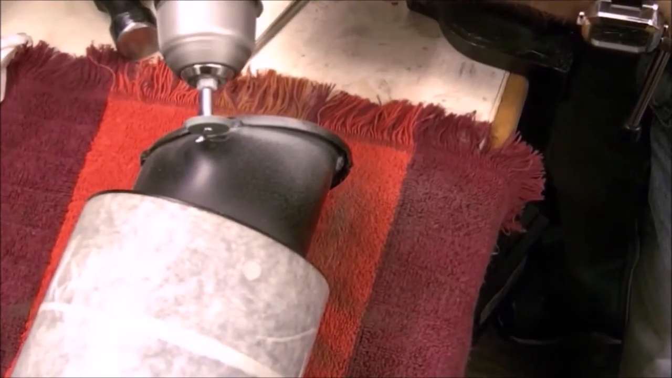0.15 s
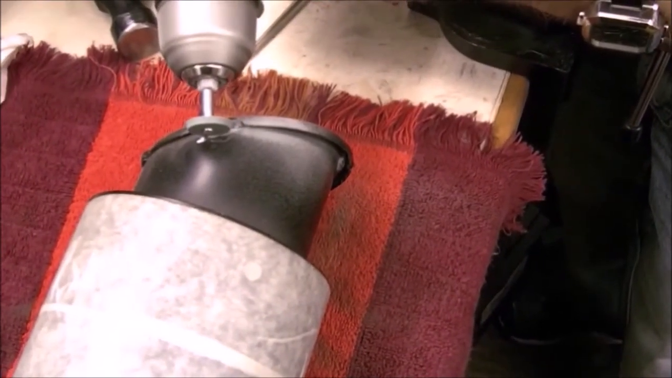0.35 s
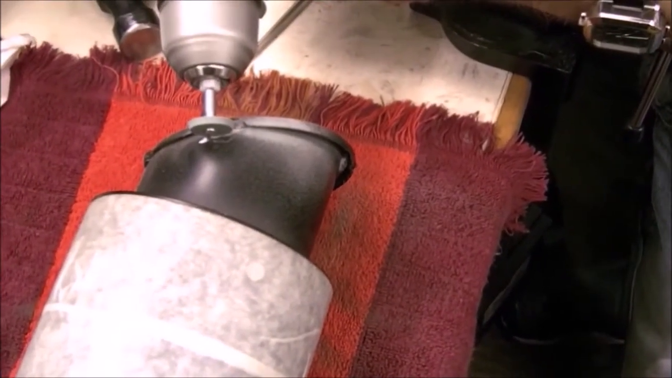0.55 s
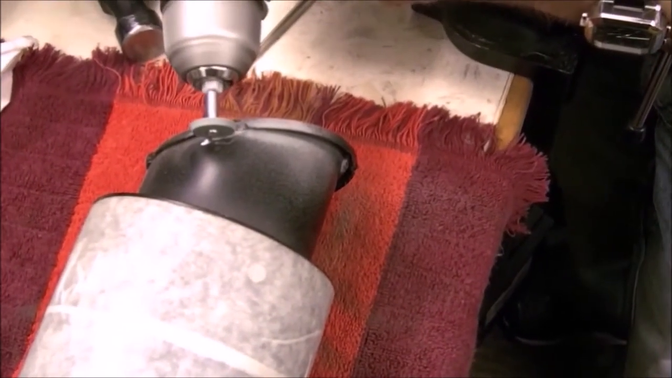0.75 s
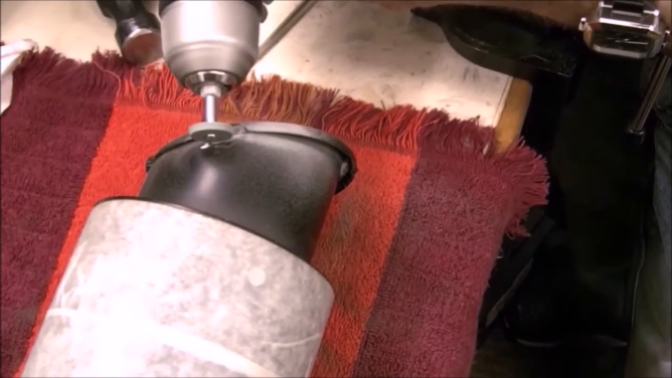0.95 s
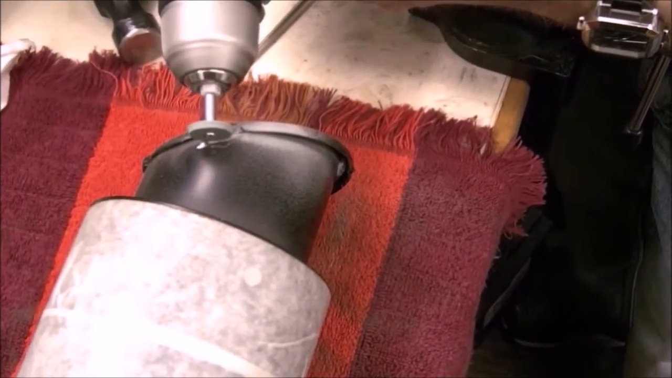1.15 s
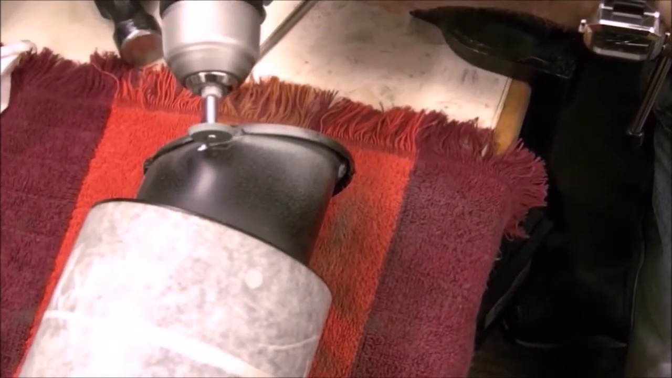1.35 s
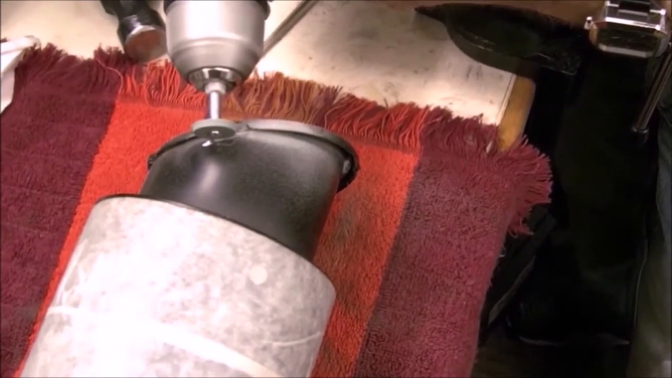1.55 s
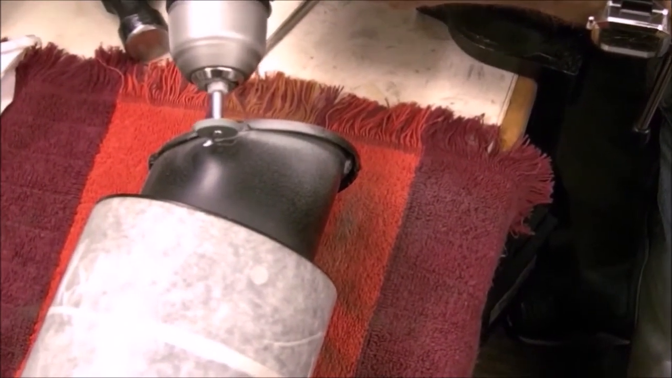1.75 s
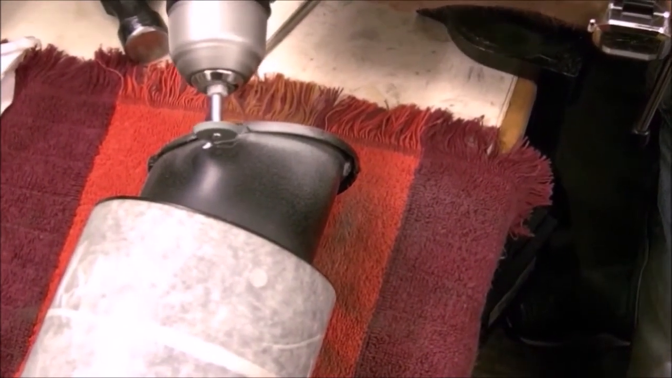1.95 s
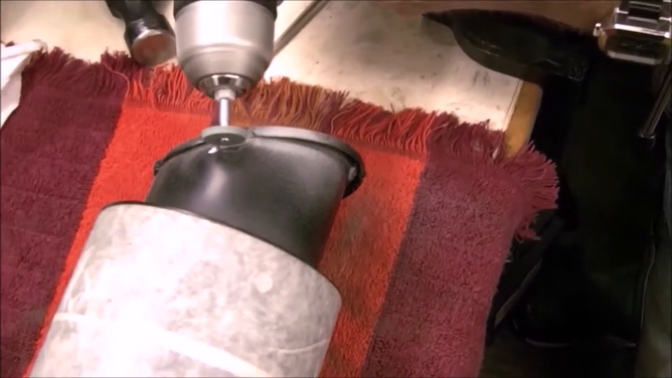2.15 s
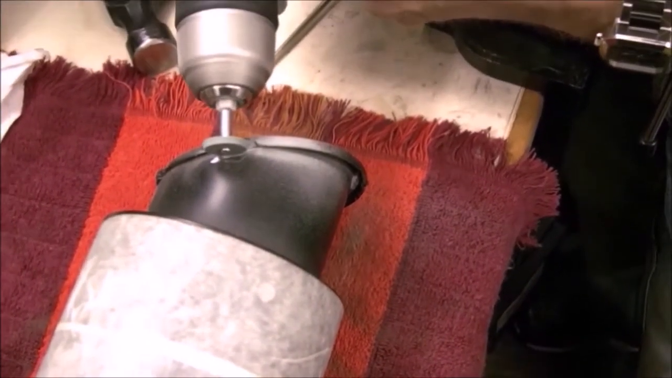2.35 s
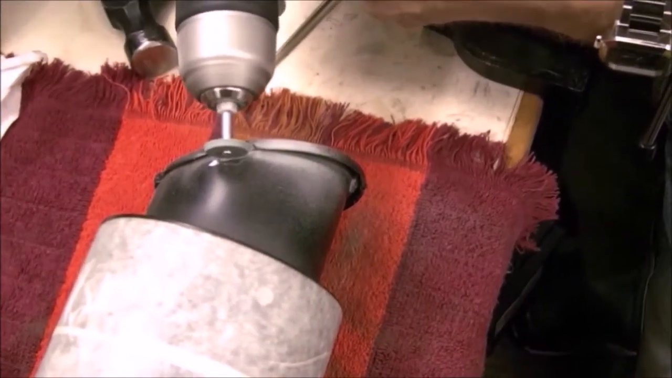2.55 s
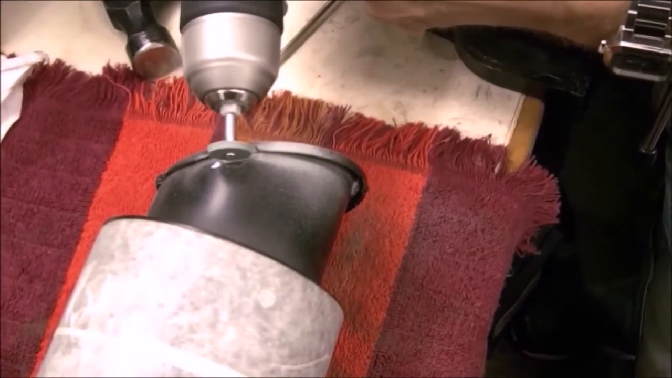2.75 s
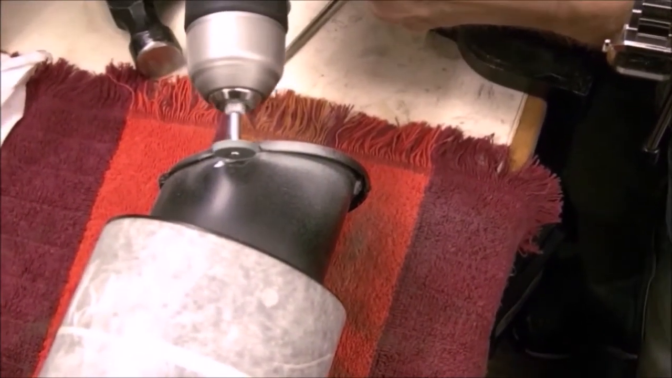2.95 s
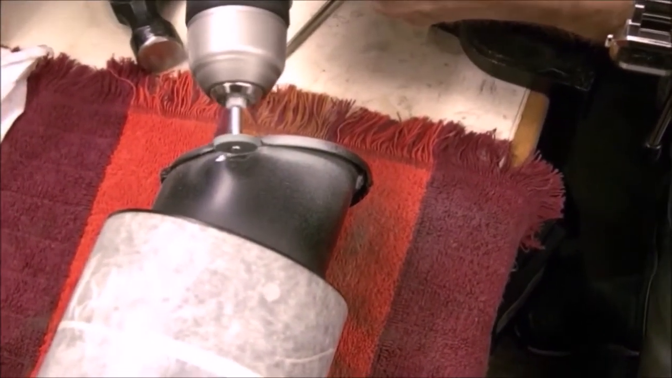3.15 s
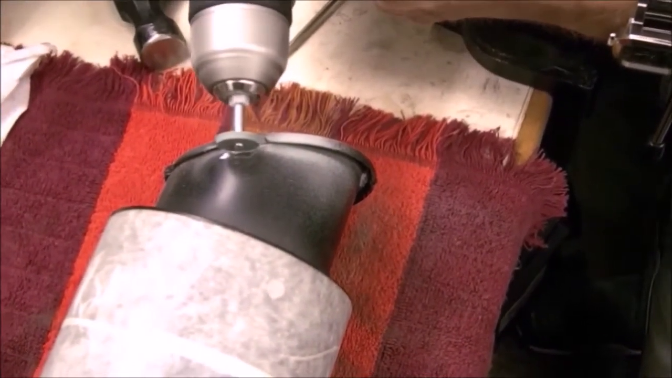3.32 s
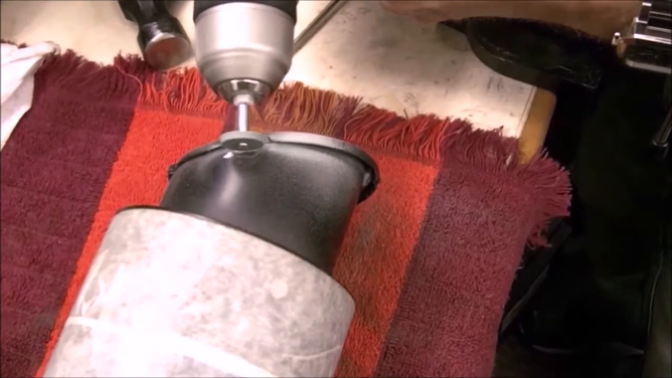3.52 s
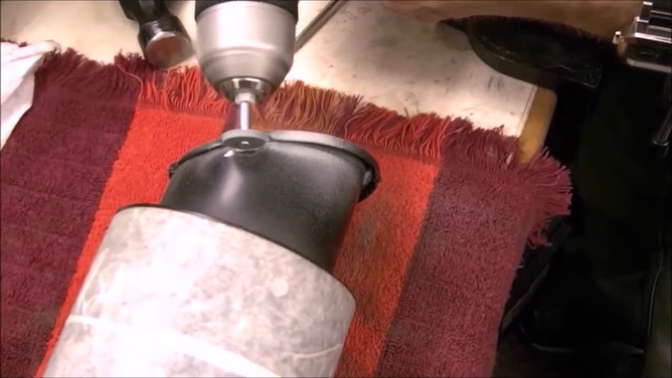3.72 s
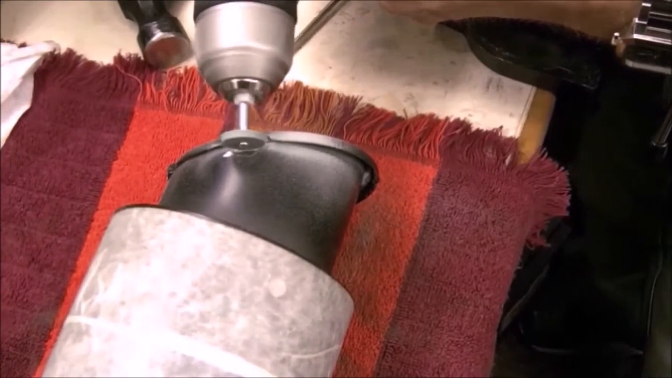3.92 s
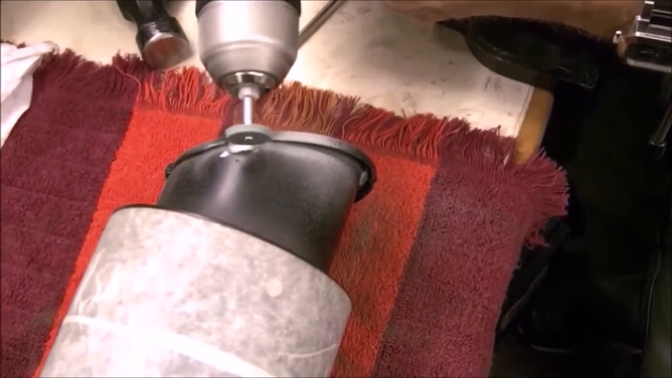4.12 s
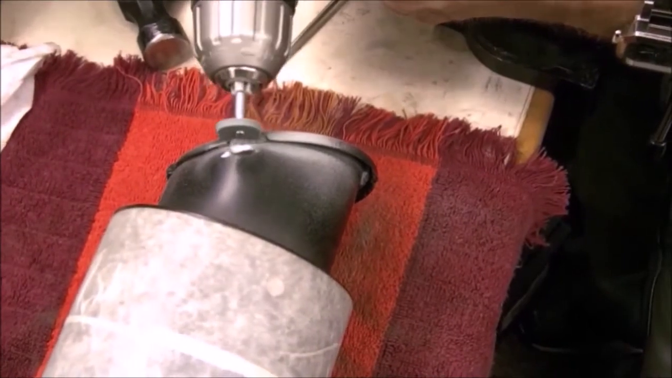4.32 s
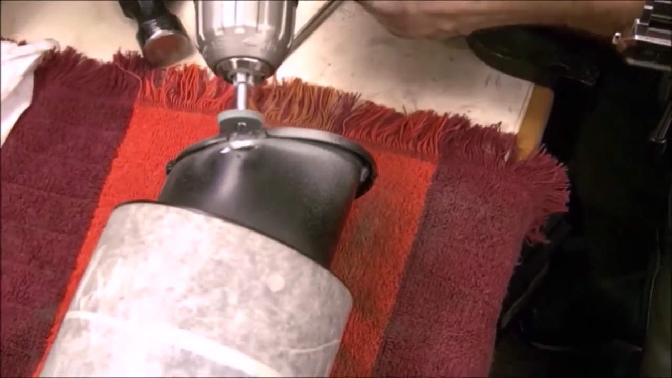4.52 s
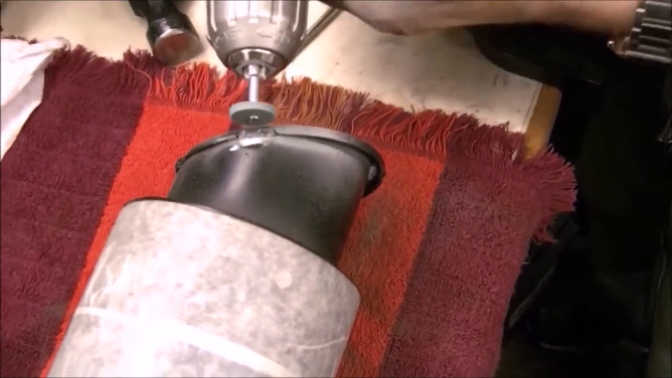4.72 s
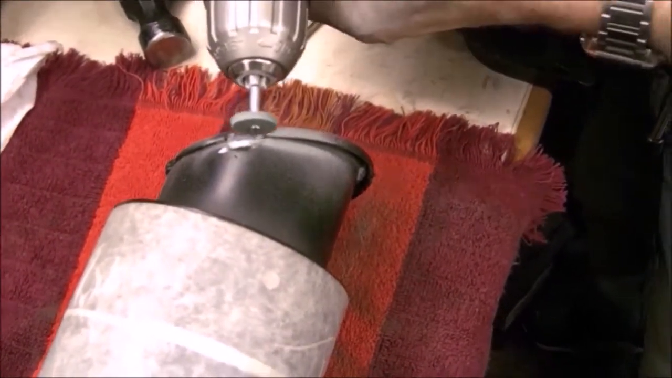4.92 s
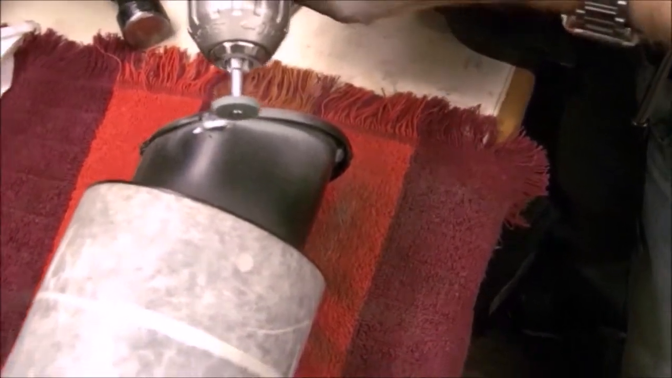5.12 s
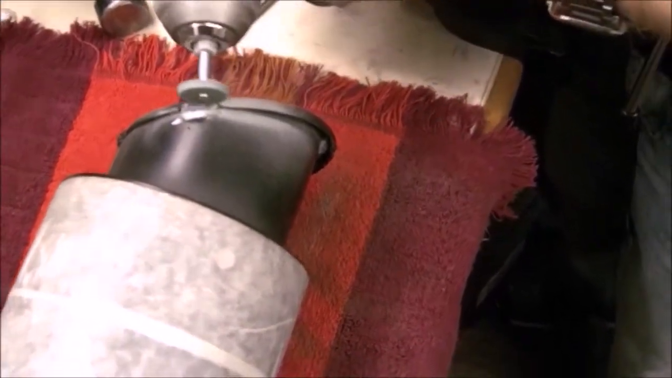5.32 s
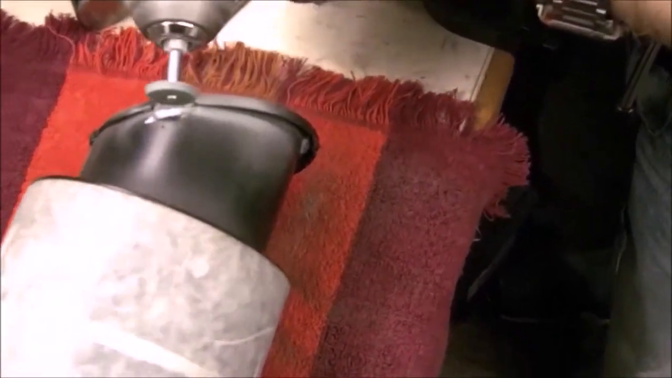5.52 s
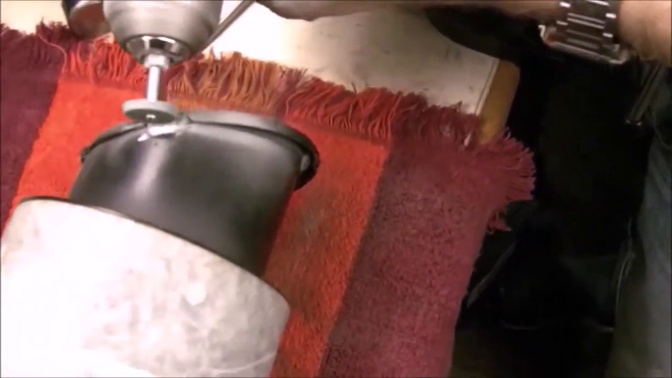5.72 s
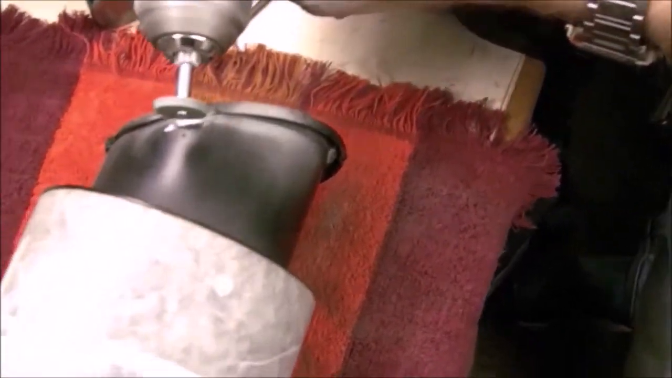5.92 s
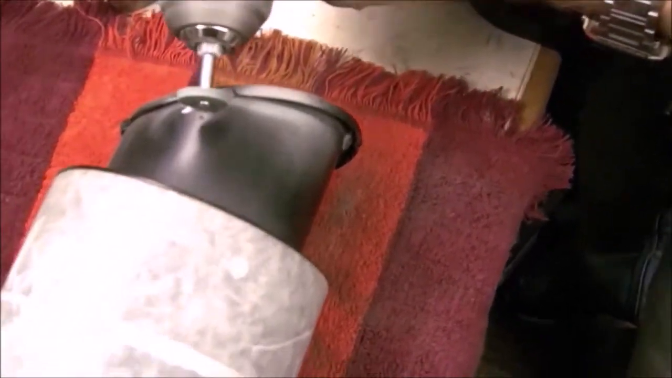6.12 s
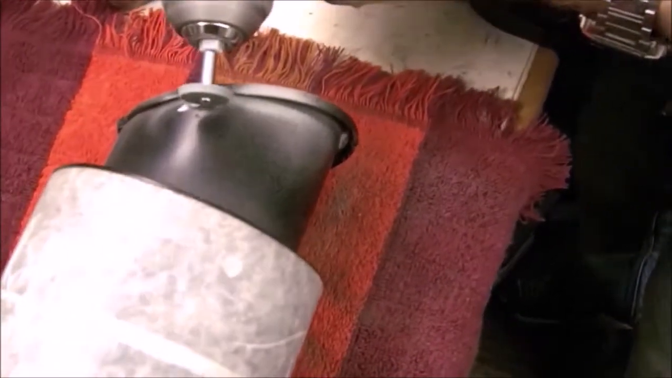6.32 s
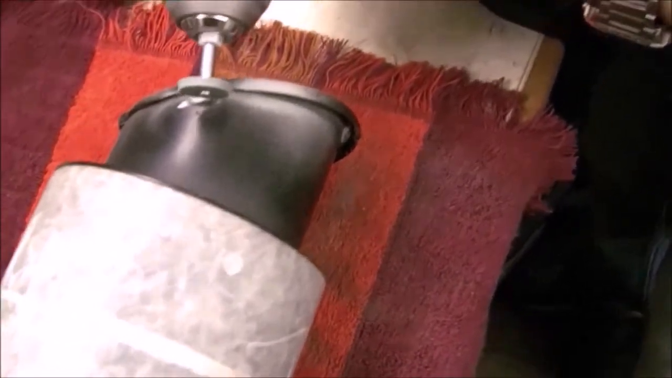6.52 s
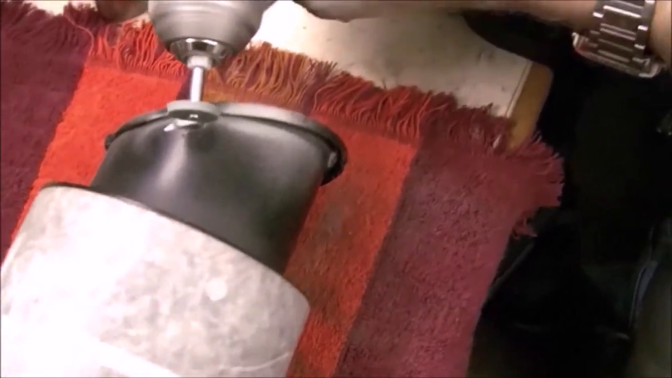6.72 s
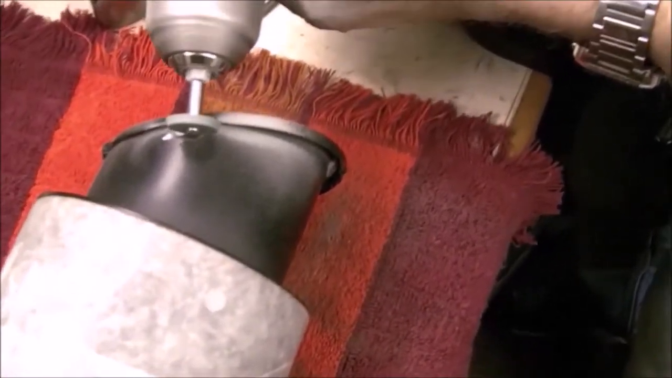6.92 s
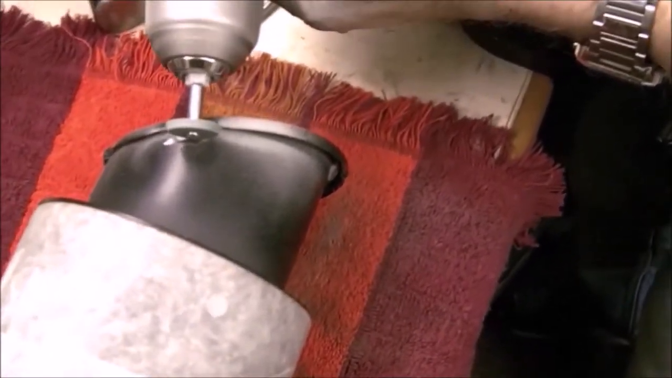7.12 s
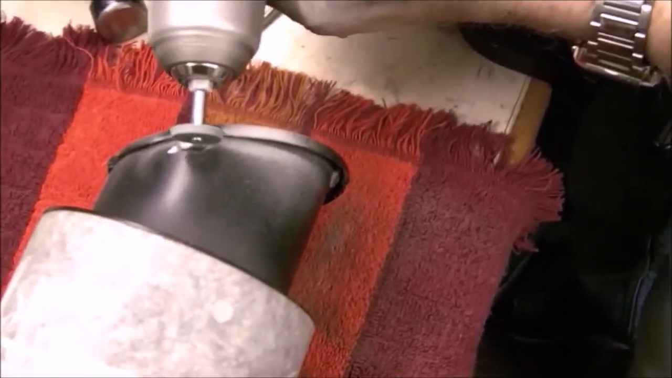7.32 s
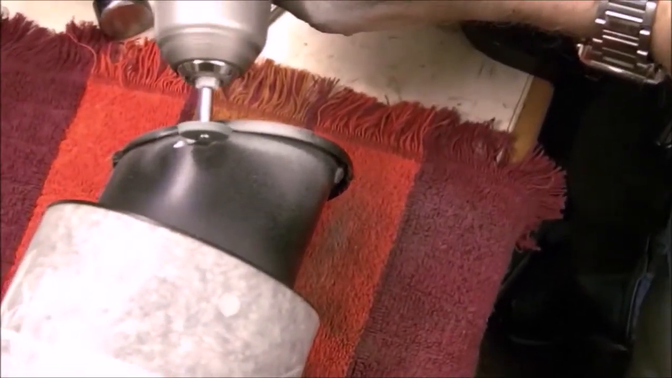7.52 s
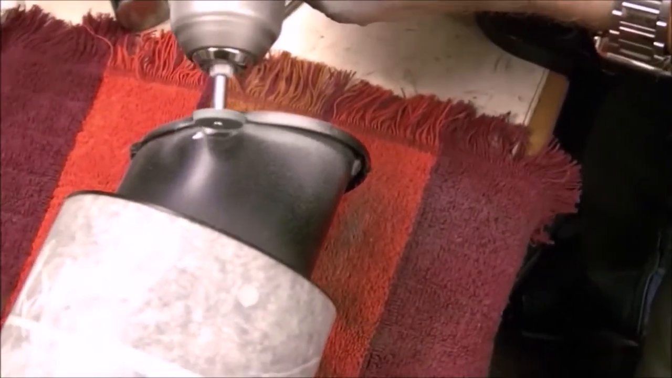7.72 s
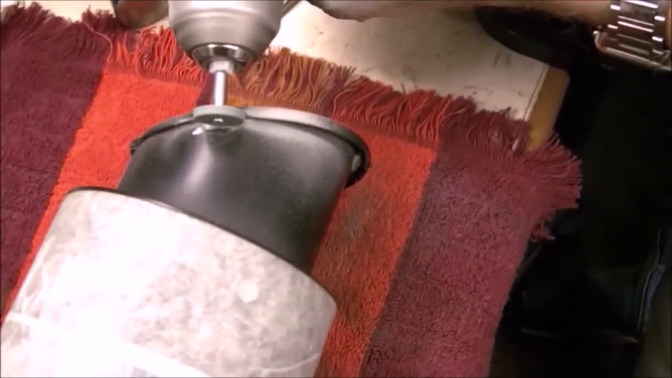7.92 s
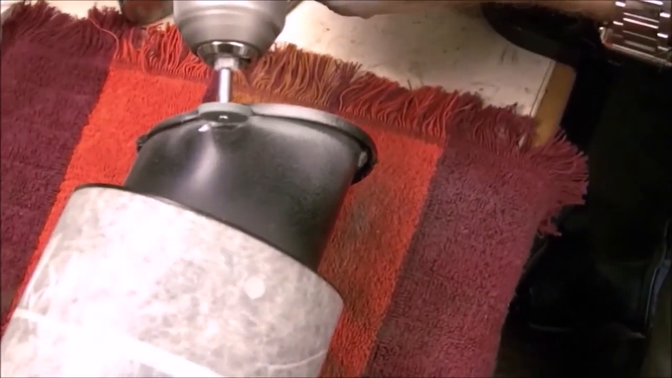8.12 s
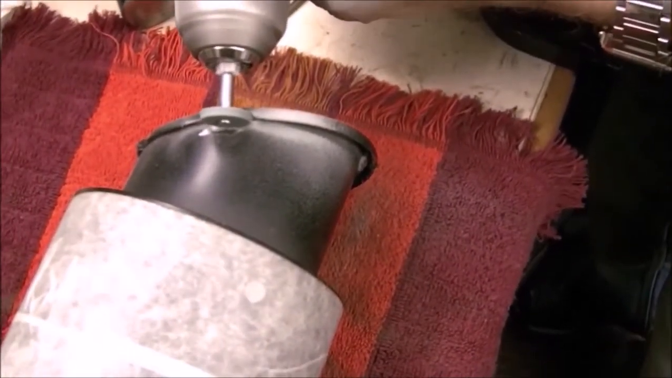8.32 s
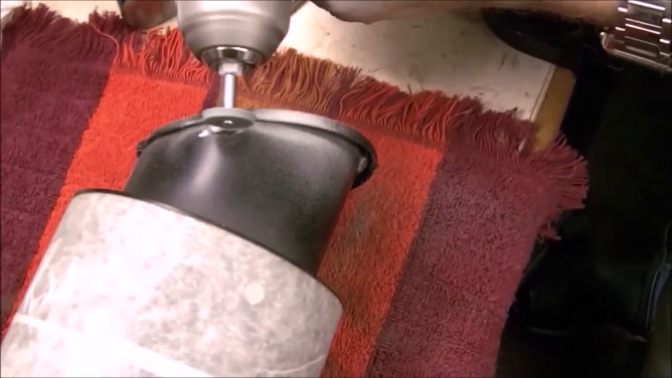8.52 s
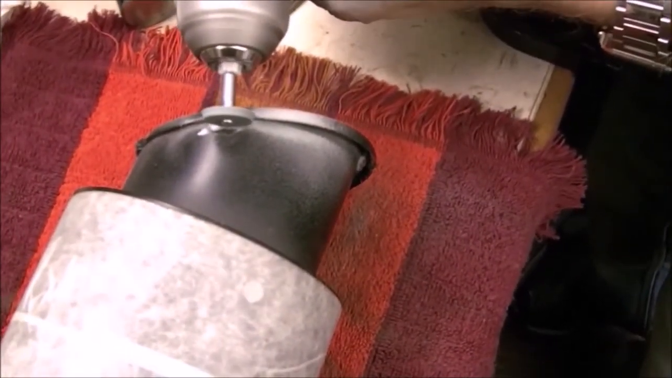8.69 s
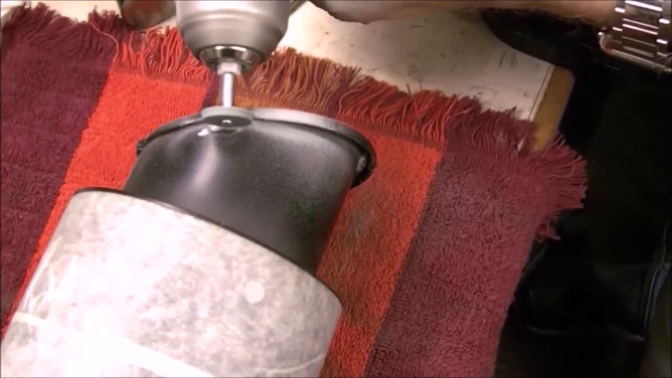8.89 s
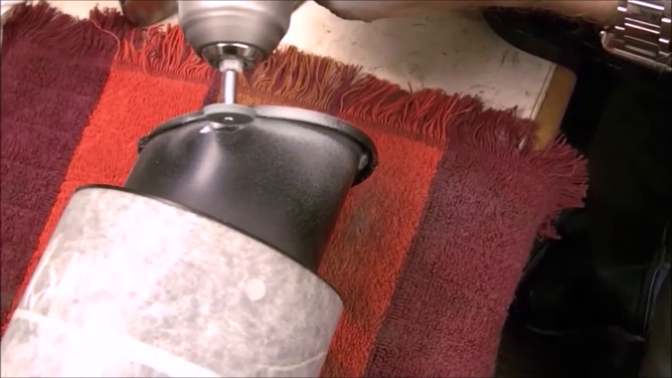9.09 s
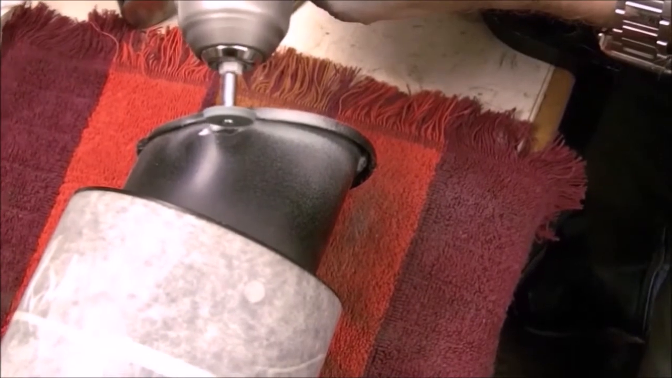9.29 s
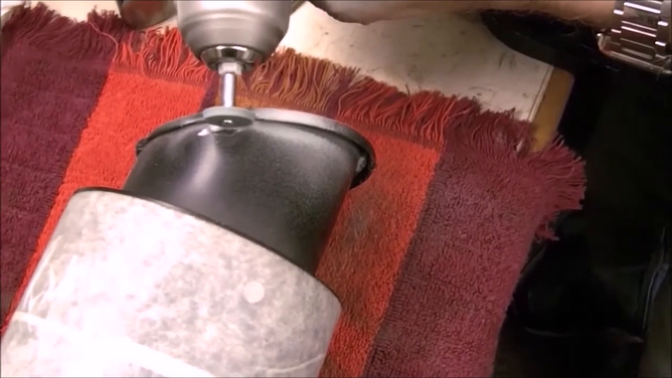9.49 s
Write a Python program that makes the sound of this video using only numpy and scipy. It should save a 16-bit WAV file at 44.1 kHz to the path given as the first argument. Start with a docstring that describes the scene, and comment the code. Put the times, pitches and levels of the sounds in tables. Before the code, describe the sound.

Close by in a quiet workshop, a battery drill hums and whines while its stone scrapes steadily on a metal rim, throwing off bright ticks and pings. The motor winds down with a clunk, leaving about a second of soft handling taps. Then it starts again and whirs without load. The stone returns to the metal, lightly at first, building into a fast, throbbing grind with a shrill screech.

```python
"""A workshop: a cordless drill spins a small grinding stone against the rim of a metal end cap on a rug.
Grit tears at the rim and rings the cap's modes; the stone runs out of true, so it throbs once a turn.
The motor hums and whines, and its gears rattle the housing. The drill brakes to a stop, is shifted in
the hand, restarts with a knock, runs free, then is pressed on harder and harder until the rim screeches."""
import sys
import numpy as np
from scipy import signal
from scipy.fft import rfft, irfft, next_fast_len
from scipy.io import wavfile

SR = 44100
rng = np.random.default_rng(int(sys.argv[2]) if len(sys.argv) > 2 else 0)


def wav_record(signal):
    """Record a signal, one row per channel, as 16-bit PCM in the file named by sys.argv[1]."""
    frames = np.transpose(np.atleast_2d(signal))
    bounded = np.clip(frames, -1, 1)
    # unit amplitude maps onto the largest positive 16-bit level
    quanta = np.round(bounded * 32767).astype(np.int16)
    wavfile.write(sys.argv[1], SR, quanta)


N = 421155
TIME_S = np.arange(N) / SR
FFT_SIZE = next_fast_len(N + SR // 2, True)
BIN_HZ = np.maximum(np.arange(FFT_SIZE // 2 + 1) * SR / FFT_SIZE, 1)
RELEASE_S, BRAKE_S, RESTART_S = 3.998, 4.174, 5.15
FIRM_DB = -30  # grinding level of a firm press

# motor with the trigger held: (time [s], speed [turns/s])
CRUISE = [(0, 338), (1.2, 340.3), (1.9, 340.4), (2.25, 341.7), (3.95, 340.8), (5.6, 341), (5.9, 344.5),
          (6.2, 342.4), (7.45, 345.3), (8.1, 343), (8.6, 344.8), (8.9, 342.5), (9.55, 342)]
# hardest bites, and first grazes of pass 2: (time [s], level [dB], ping [Hz])
HARD_BITES = [(0.044, -18, 3500), (0.112, -22, 3900), (0.188, -19, 3830), (0.2165, -18, 3840),
              (0.4235, -18, 3950), (0.448, -24, 3970), (0.6036, -19, 3520), (0.933, -19, 3940),
              (1.045, -20, 4000), (1.1613, -17, 4030), (1.413, -20, 3530), (1.646, -19, 3850),
              (1.804, -17, 3870), (1.901, -18, 3950), (1.977, -18, 4120), (2.024, -21, 3370),
              (2.408, -20, 3680), (2.8624, -22, 3660), (2.99, -18, 4080), (3.012, -19, 3850),
              (3.064, -17, 3600), (3.089, -18, 3460), (3.1166, -20, 3930), (3.1667, -18.5, 3620),
              (3.2191, -20, 3640), (3.241, -18, 3550), (3.289, -14, 4100), (3.3433, -18, 3400),
              (3.469, -18.5, 3460), (3.5743, -19, 3830), (3.726, -19, 3500), (3.776, -15.5, 3890),
              (3.877, -18, 4130), (7.1633, -17, 3580), (7.207, -20, 3970), (7.2554, -19, 4050),
              (7.421, -22, 3830), (7.456, -19, 4010), (7.506, -13.5, 3970), (7.5562, -18, 4030),
              (7.616, -24, 3940), (7.657, -25, 4200), (7.710, -20, 3990), (7.7567, -12, 4150),
              (7.812, -18, 3950), (7.856, -12.5, 3900), (7.9054, -15, 3480), (8.0038, -15, 4030),
              (8.057, -11.5, 3950), (8.156, -14, 3980), (8.207, -15, 3330), (8.254, -18, 3870),
              (8.296, -16.5, 3870), (8.360, -13, 3970), (8.408, -18, 3690), (8.461, -16, 4070),
              (8.512, -13, 3530), (8.554, -12.5, 3480), (8.609, -14.5, 4160), (8.655, -13.5, 3400),
              (8.707, -15, 3980), (8.811, -14.5, 3870), (8.857, -13, 3940), (8.896, -15, 3760),
              (8.956, -11, 3280), (9.0604, -8, 3490), (9.1092, -14, 3540), (9.2618, -14, 3520),
              (9.3664, -16, 3880), (9.4155, -14, 3700)]


def grinding(contacts_db, bites, snags, chatter_db=1.54, skip_db=1.32, graze_db=-3.5):
    """Grit tears at the rim; each bite or snag is a brief rise in the force on the cap."""
    bite_force = from_db(-12.5) * burst(bites[:, :2], rise_s=0.00069, t60_s=0.075)
    snag_force = from_db(-3) * burst(snags[:, :2], rise_s=0.00031, t60_s=0.034)
    out = 0
    for pass_index, touch_db in enumerate(contacts_db):
        friction = from_db(touch_db - 2 + chatter_db * drift(190) + skip_db * drift(52))
        depth = from_db(np.clip((touch_db - FIRM_DB) / 2, graze_db, 0))
        in_pass = (TIME_S > RESTART_S) == pass_index
        catches = np.hypot(depth * bite_force, snag_force) * in_pass
        out = out + end_cap(np.hypot(friction, catches), pass_index)
    return out


def end_cap(force, pass_index, wander_hz=14, wander_db=2.2, detune=0.01):
    """The contact wanders between two spots on the rim; each lifts and sharpens alternate modes."""
    # cap colour: (frequency [Hz], pass 1 gain [dB], pass 2 gain [dB])
    cap_colour = [(50, -22, -27.5), (103, -17, -14.5), (158, -1.5, -3), (254, -12.5, -7.5),
                  (433, -6.5, -3.5), (513, -4, -1), (600, -2.5, -4.5), (1280, -8.5, -10), (1860, -13, -4),
                  (3680, -2.5, 1), (5500, -1, -2), (8350, -20, -14), (12300, -13, -14.5),
                  (14700, -21.5, -20)]
    # cap resonances: (frequency [Hz], width [Hz], pass 1 gain [dB], pass 2 gain [dB])
    cap_modes = [(564, 41, 7, -0.5), (619, 58, 9, 5), (685, 68, 1.5, 12.5), (796, 49, -3, 11),
                 (954, 43, 10, 13.5), (996, 50, 7.5, 2.5), (1133, 190, 15, 16.5), (1358, 73, 16.5, 11),
                 (1502.5, 73, 17, 19), (1633, 116, 20.5, 18), (2272, 210, 17.5, 9), (2670, 355, 12.5, 5),
                 (3090, 70, 6, 7), (3370, 590, 8.5, 9), (3800, 610, 7, 6), (3870, 140, 2.5, 5),
                 (4113, 250, 6, 8.5), (4670, 500, 3, 2), (5150, 630, 1.5, 5), (6190, 190, 5.5, 4),
                 (6920, 190, 6, 7), (7355, 840, 9.5, 10.5), (7960, 161, 0, -12), (8280, 490, 13, 7.5),
                 (8860, 190, 9.5, 5), (9340, 1440, 7, 4.5), (10600, 212, 6, 5)]
    slope = np.array(cap_colour)[:, [0, pass_index + 1]]
    hz, width_hz, db = np.array(cap_modes)[:, [0, 1, pass_index + 2]].T
    favoured = (-1) ** np.arange(len(hz))
    place = np.tanh(drift(wander_hz))
    out = 0
    for spot in (-1, 1):
        modes = zip(hz * (1 + spot * favoured * detune), width_hz, db + spot * favoured * wander_db)
        grit = force * np.sqrt((1 + spot * place) / 2) * grains(24000, spread_db=2.0)
        out = out + body(grit, colour_db(slope, modes))
    return out


def pressure_db(press, lift_db_per_s=224):
    """Grinding level of one pass, fading fast where the stone is off the rim."""
    off_s = np.abs(TIME_S - np.clip(TIME_S, press[0][0], press[-1][0]))
    return in_time(press)[0] - lift_db_per_s * off_s


def stone_turns(motor_turns, high_side_s, gear_ratio=17.25):
    """Turns of the stone, whole whenever its high side meets the rim."""
    return (motor_turns - np.interp(high_side_s, TIME_S, motor_turns)) / gear_ratio


def low_side(stone):
    """Narrow pulse, 1 when the stone's low side faces the rim."""
    return np.abs(np.sin(np.pi * stone)) ** 6


def contact_db(pressed_db, stone, swell_db, gap_db, flatten_per_db=0.085):
    """Run-out: a swell on the high side, a short gap on the low side; pressure flattens both."""
    gap = low_side(stone)
    throb_db = swell_db * np.cos(2 * np.pi * stone) - gap_db * (gap - gap.mean())
    return pressed_db + throb_db * np.clip(0.5 - flatten_per_db * (pressed_db - FIRM_DB), 0, 1.4)


def turn_bites(press, stone, usual_db, lead_s=0.0018, jitter_s=0.003):
    """The high side bites once a turn, except near a hard bite: (time [s], level [dB], ping [Hz])."""
    timing, size, pitch = rng.standard_normal(size=(100, 3)).T
    first_turn = np.ceil(np.interp(press[0][0], TIME_S, stone))
    at_s = np.interp(first_turn + np.arange(len(size)), stone, TIME_S) - lead_s + jitter_s * timing
    harder_db = np.interp(at_s, TIME_S, pressure_db(press)) - FIRM_DB
    level_db = usual_db + 0.1 * harder_db + 0.8 * size
    ping_hz = 3830 - 13.5 * harder_db + 170 * pitch
    apart = np.abs(at_s[:, None] - np.array(HARD_BITES)[:, 0]).min(axis=1) > 0.025
    in_pass = (at_s > 0) & (at_s < press[-1][0] - 0.02)
    return np.column_stack([at_s, level_db, ping_hz])[apart & in_pass]


def grit_snags(touch_db, count=340, spread_db=2.5, ping_hz=(3330, 4200)):
    """Coarse grit catches at random, mostly lightly: (time [s], level [dB], ping [Hz])."""
    when, size, pitch = rng.random(size=(count, 3)).T
    at_s = when * TIME_S[-1]
    level_db = np.interp(at_s, TIME_S, touch_db) - 1 + spread_db * np.minimum(-np.log(1 - size), 2)
    return np.column_stack([at_s, level_db, np.interp(pitch, [0, 1], ping_hz)])


def cap_rings(bites, snags, pressed_db):
    """Bites and snags ping the rim; now and then a lower wall mode rings longer."""
    # loud rings of the cap's wall: (time [s], level [dB], frequency [Hz])
    loud_rings = [(0.238, -28, 1170), (0.401, -23.5, 1638), (0.5142, -23.5, 1656), (0.612, -22.5, 1613),
                  (0.818, -27.5, 1590), (0.9218, -26, 1655), (0.9833, -26, 1500), (1.4342, -22, 1650),
                  (2.1984, -25, 1540), (2.481, -29, 1210), (2.9852, -26.5, 1150), (3.258, -29, 1560),
                  (3.4391, -29, 1610), (3.441, -29, 1290), (3.5897, -28, 1170), (3.747, -27, 1260),
                  (3.987, -29.5, 2250), (7.7695, -19, 1530), (8.1654, -26, 1600), (8.44, -28, 1640),
                  (9.176, -25, 1585), (9.2863, -27, 1520), (9.332, -26, 1574)]
    pings = burst(bites, rise_s=0.001, t60_s=0.041, wobble_rad=1.08 * drift(126))
    ticks = burst(snags, rise_s=0.0005, t60_s=0.026, wobble_rad=drift(160))
    wall_rings = np.vstack([loud_rings, soft_rings(pressed_db)])
    wall = burst(wall_rings, rise_s=0.0037, t60_s=0.065, wobble_rad=0.58 * drift(60))
    return from_db(-4.5) * pings + from_db(3.5) * ticks + from_db(7.5) * wall


def soft_rings(pressed_db, count=50, spread_db=1.2):
    """Random knocks on the wall, scaled by pressure: (time [s], level [dB], frequency [Hz])."""
    # wall modes, a row per pass: four of (frequency [Hz])
    wall_hz = [
        [1152, 1500, 1505, 1645],
        [1515, 1605, 1615, 1500],
    ]
    when, which = rng.random(size=(count, 2)).T
    at_s = when * TIME_S[-1]
    level_db = np.interp(at_s, TIME_S, pressed_db) - 3.5 + spread_db * rng.standard_normal(count)
    hz = np.array(wall_hz)[(at_s > RESTART_S).astype(int), (which * 4).astype(int)]
    return np.column_stack([at_s, level_db, hz])


def screech(pressed_db, stone, onset_db=-26.5, swell_db=1.5, gap_db=10):
    """Pressed hard, the rim screeches in pulses, dipping once a turn as the stone's low side passes."""
    # rim resonances: (frequency [Hz], width [Hz], gain [dB])
    rim_modes = [(1590, 52, 20), (3370, 320, 11.5), (3640, 380, 13.6), (3980, 300, 17)]
    level_db = -30 + 2.8 * np.minimum(pressed_db - onset_db, 0) + 0.5 * drift(140)
    level_db += swell_db * np.cos(2 * np.pi * stone) - gap_db * low_side(stone)
    level_db -= 12.5 * (TIME_S < RESTART_S)  # the first spot screeches less
    rim_db = colour_db([(300, -23), (1200, -4.5), (4000, 4.0), (7500, 3.0), (14000, -19)], rim_modes)
    return body(from_db(level_db) * grains(5000, spread_db=-0.5), rim_db)


def chips(touch_db, spread_db=8.5, count=260):
    """Single grains break off with short, bright scratches that follow the contact level."""
    # scratch resonances: (frequency [Hz], width [Hz], gain [dB])
    chip_modes = [(3950, 540, 8), (7250, 500, 9.7), (8360, 400, 7)]
    scratches = burst(rng.random(size=(count, 2)) * [TIME_S[-1], spread_db], rise_s=0.0002, t60_s=0.023)
    bright_db = colour_db([(500, -30), (2500, -12.5), (4500, 1), (9000, -5.5), (14000, -14)], chip_modes)
    return body(from_db(touch_db - 12) * scratches * grains(9000, spread_db=4.0), bright_db)


def motor_speed_hz(coast_hz_per_s=690, brake_hz_per_s=3500, jump_s=0.023, creep_s=0.07):
    """The rotor coasts on release, then brakes hard; at the restart it jumps, then creeps up to speed."""
    cruise_hz = in_time(CRUISE)[0]
    lost_hz = coast_hz_per_s * np.maximum(TIME_S - RELEASE_S, 0)
    lost_hz += brake_hz_per_s * np.maximum(TIME_S - BRAKE_S, 0)
    age_s = np.maximum(TIME_S - RESTART_S, 0)
    run_up = 1 - 0.7 * np.exp(-age_s / jump_s) - 0.3 * np.exp(-age_s / creep_s)
    return np.maximum(cruise_hz - lost_hz, 0) + cruise_hz * run_up


def motor(speed_hz, pressed_db, flutter=0.0014, whine_from_hz=315, load_db=-3.5):
    """Lines locked to the rotor grow with its speed; load damps the overtones."""
    # main tones: (time [s], hum [dB], whine [dB])
    tone_levels = [(0, -49, -39.5), (1.9, -46, -39.5), (2.25, -47, -42), (3.95, -48.5, -40.5),
                   (5.3, -45, -34.5), (5.85, -44, -46.5), (6.85, -42, -46), (7.45, -50.5, -46),
                   (8.5, -48.5, -48.5), (9.55, -49.5, -39.5)]
    # overtones at full speed: (multiple of rotor rate, level [dB])
    motor_lines = [(2, -46.5), (10, -49.5), (12, -53), (13, -63), (15, -49), (21, -60.5), (22, -60),
                   (24, -60), (25, -64.5), (26, -65), (27, -61), (29, -64), (30, -67), (31, -61.5),
                   (32, -72.5)]
    hum_db, whine_db = in_time(tone_levels)
    pace = speed_hz / in_time(CRUISE)[0]
    angle_rad = phase_rad(speed_hz * (1 + flutter * drift(45.6)))
    hum = pace ** 11 * from_db(hum_db + 1.6 * drift(17)) * np.sin(angle_rad)
    whine_gate = (1 + np.tanh((speed_hz - whine_from_hz) / 8)) / 2
    whine = whine_gate * from_db(whine_db + 1.3 * drift(26)) * np.sin(5 * angle_rad)
    load = np.clip(from_db(pressed_db - FIRM_DB), 0, 1)
    overtones = pace ** 30 * from_db(load_db * load) * rotor_lines(motor_lines, angle_rad, waver_db=2.0)
    return np.sqrt(2) * (hum + whine + overtones + gear_strain(speed_hz, pace, angle_rad))


def gear_strain(speed_hz, pace, angle_rad, shudder=0.004, coast_hz_per_s=690):
    """Slowing and speeding up strain the gears; their lines glide through the housing's hump."""
    # gear lines: (multiple of rotor rate, level [dB])
    strain_lines = [(2, -40.5), (5, -35.5), (8, -50), (10, -46), (12, -46), (14, -48)]
    # path through the housing: (frequency [Hz], gain [dB])
    strain_colour = [(200, -24), (430, -19), (560, 5.5), (760, 3.5), (1100, 8), (1300, 0), (1550, -6),
                     (2500, 4), (4500, 0.5), (9000, -7.5)]
    accel = np.gradient(speed_hz) * SR / coast_hz_per_s
    braking, driving = np.maximum(-accel, 0), np.maximum(accel, 0) / accel.max()
    torque = np.minimum(braking ** 2, braking ** 0.35) + from_db(8.5) * driving ** 0.7
    shaken_rad = angle_rad + phase_rad(speed_hz * shudder * drift(150))
    growl = torque * pace ** 0.5 * from_db(-10) * rotor_lines(strain_lines, shaken_rad, waver_db=3.0)
    return body(growl, colour_db(strain_colour))


def rotor_lines(lines, angle_rad, waver_db):
    """Sines at whole multiples of the rotor angle, each wavering in level."""
    return sum(from_db(db + waver_db * drift(32)) * np.sin(order * angle_rad + rng.uniform(0, 2 * np.pi))
               for order, db in lines)


def gearbox(speed_hz, motor_turns, knee_hz=200, settle_s=0.15, mesh_db=1.0):
    """Teeth and brushes rattle the housing in step with the rotor; slack knocks it at stop and start."""
    # housing colour: (frequency [Hz], gain [dB])
    housing_colour = [(50, -22.5), (190, -34.5), (300, -10), (480, -13.5), (600, -5.0), (1100, -18),
                      (1400, -3), (2200, -2), (3400, 0.5), (6000, -9), (10500, -18), (12000, -19),
                      (14400, -26.5)]
    # housing resonances: (frequency [Hz], width [Hz], gain [dB])
    housing_modes = [(363, 57, 11), (603, 114, 6.5), (700, 115, 12), (810, 113, 12), (952, 130, 16.5),
                     (1054, 58, 1), (1095, 243, 17.5), (1560, 190, 3.5), (2095, 324, 9.5), (2920, 870, 3.5),
                     (4370, 730, -5), (5270, 400, 8.5), (7260, 165, 5), (7854, 221, -5.5), (8740, 540, 4.5),
                     (10140, 600, 8.5)]
    # gears take up slack: (time [s], level [dB])
    slack_knocks = [(4.183, -28), (5.14, -46), (5.15, -39), (5.157, -33), (5.164, -31)]
    running = np.minimum(speed_hz / knee_hz, 1) ** 2
    settled = np.clip((TIME_S - RESTART_S) / settle_s, 0, 1) ** 2
    rattle_db = -37 + 2.2 * settled + mesh_db * np.cos(2 * np.pi * motor_turns) + 1.17 * drift(39)
    knocks = burst(slack_knocks, rise_s=0.00052, t60_s=0.099) * rng.standard_normal((2, N))
    rattle = running * from_db(rattle_db) * grains(14000, spread_db=2.5)
    housing_db = colour_db(housing_colour, housing_modes)
    dull_db = colour_db([(200, -10), (650, 2.5), (1500, 4.5), (2100, 0.5), (3000, 0.5),
                         (4000, -2), (14000, -2)])
    return body(rattle, housing_db) + body(knocks, housing_db + dull_db)


def winding_squeal(at_s=5.134, level_db=-42, hz=3900):
    """The windings sing briefly as the trigger is pulled."""
    return burst([(at_s, level_db, hz)], rise_s=0.007, t60_s=0.1, wobble_rad=0.2 * drift(60))


def grip():
    """Each shift of the hand rubs the hollow handle and knocks it."""
    # drill settles, grip shifts: (time [s], level [dB], knock [Hz])
    shifts = [(4.225, -45.5, 312), (4.387, -56, 745), (4.49, -62, 483), (4.529, -67, 456),
              (4.588, -58, 796), (4.736, -57, 616), (4.79, -63, 1300), (4.859, -57.5, 180),
              (4.985, -62, 700), (5.109, -56, 1030)]
    # handle resonances: (frequency [Hz], width [Hz], gain [dB])
    handle_modes = [(780, 160, 6), (1420, 220, 6), (2150, 400, 6), (4700, 600, 6)]
    rub = burst(np.array(shifts)[:, :2], rise_s=0.0012, t60_s=0.13) * grains(4000, spread_db=5.5)
    knock = burst(shifts, rise_s=0.002, t60_s=0.09, wobble_rad=drift(83))
    plastic_db = colour_db([(60, -17), (160, -5), (700, 1), (1500, -7), (4500, -15), (14000, -38)],
                           handle_modes)
    return from_db(-2) * body(rub, plastic_db) + from_db(4.5) * knock


def reflections(sound, t60_s):
    """Short, dense wash from the bench and nearby walls, at unit energy gain."""
    age_s = TIME_S[:SR // 2]
    echo = rng.standard_normal(len(age_s)) * from_db(-60 * age_s / t60_s) * (age_s > 0.002)
    return signal.fftconvolve(sound, echo / np.linalg.norm(echo))[:N]


def background():
    """Quiet room noise with a faint, wavering electrical whistle."""
    # room noise colour: (frequency [Hz], gain [dB])
    room_colour = [(18, -53), (30, -26), (91, -15.5), (106, -9.5), (156, -7.5), (217, -14), (247, -8),
                   (747, -7.5), (1070, -17), (3230, -26), (3580, -27), (14000, -34)]
    # whistle lines: (frequency [Hz], level [dB])
    whistle_lines = [(3270, -79.5), (3980, -89), (6535, -87)]
    air = from_db(-65) * body(rng.standard_normal((2, N)), colour_db(room_colour))
    whistle = sum(from_db(db + 2.7 * drift(25)) * np.sin(phase_rad(hz * (1 + 0.014 * drift(160))))
                  for hz, db in whistle_lines)
    return air + np.sqrt(2) * whistle


def from_db(db):
    """Decibels to gain."""
    return 10 ** (np.asarray(db) / 20)


def phase_rad(hz):
    """Running phase of a varying frequency."""
    return 2 * np.pi * np.cumsum(hz) / SR


def in_time(rows):
    """Columns of a (time [s], values...) curve at every sample."""
    at_s, *columns = np.transpose(rows)
    return [np.interp(TIME_S, at_s, column) for column in columns]


def colour_db(points, modes=()):
    """Gain per bin: a slope through (frequency [Hz], gain [dB]) points, plus resonance peaks."""
    hz, db = np.transpose(points)
    grid_hz = BIN_HZ[::16]
    slope_db = np.interp(np.log(grid_hz), np.log(hz), db)
    peaks_db = sum(gain_db / (1 + (2 * (grid_hz - mode_hz) / width_hz) ** 2)
                   for mode_hz, width_hz, gain_db in modes)
    return np.interp(BIN_HZ, grid_hz, slope_db + peaks_db)


def body(force, gain_db):
    """Minimum-phase response of a body; white noise keeps its level."""
    gain_db = gain_db - 10 * np.log10(np.mean(from_db(gain_db) ** 2))
    cepstrum = irfft(gain_db * np.log(10) / 20, FFT_SIZE)
    cepstrum[1:FFT_SIZE // 2] *= 2
    cepstrum[FFT_SIZE // 2 + 1:] = 0
    return irfft(rfft(force, FFT_SIZE) * np.exp(rfft(cepstrum)), FFT_SIZE)[..., :N]


def drift(rate_hz, step=16):
    """Smooth random curve of unit spread, low-passed at rate_hz."""
    white = rfft(rng.standard_normal(FFT_SIZE // step))
    slow = irfft(white / (1 + (BIN_HZ[:len(white)] / rate_hz) ** 2))
    return np.interp(TIME_S, np.arange(len(slow)) * step / SR, slow / slow.std())


def grains(per_s, spread_db):
    """Tiny random impacts of uneven size, as mid and side; rms 1."""
    sizes = from_db(spread_db * np.minimum(rng.exponential(1, (2, N)), 4))
    clicks = (rng.random((2, N)) < per_s / SR) * sizes * rng.choice([-1, 1], (2, N))
    return clicks / clicks.std()


def burst(rows, rise_s, t60_s, wobble_rad=None):
    """Rise-and-decay envelopes at (time [s], level [dB]); a third column [Hz] makes them tones."""
    out = np.zeros(N)
    for at_s, db, *hz in rows:
        span = slice(int(at_s * SR), int((at_s + 2 * t60_s) * SR))
        age_s = TIME_S[:len(TIME_S[span])]
        tone = np.sin(2 * np.pi * hz[0] * age_s + wobble_rad[span]) if hz else 1
        out[span] += from_db(db - 60 * age_s / t60_s) * (1 - np.exp(-age_s / rise_s)) * tone
    return out


def scene():
    """Two grinding passes straight ahead; the treble spreads wide and leans slightly left."""
    # pass 1, held steady: (time [s], grinding level [dB])
    steady_press = [(0, -29.5), (0.55, -31), (1.3, -30.5), (1.6, -30), (1.9, -30.5), (3.4, -29),
                    (3.98, -30)]
    # pass 2, pressed ever harder: (time [s], grinding level [dB])
    growing_press = [(7.4, -45), (7.53, -40), (7.64, -36.5), (7.87, -33), (8.0, -31), (8.4, -29.5),
                     (8.95, -27.5), (9.55, -26)]
    # run-out per pass: (high side on rim [s], swell [dB], low-side gap [dB], usual bite [dB])
    run_out = [(2.528, 1.0, 0.5, -25.5), (8.711, 2, 6.5, -21.5)]
    # stereo width: (frequency [Hz], side gain [dB])
    side_colour = [(60, -15), (95, -13.5), (150, -20), (240, -17), (370, -21.5), (590, -18.5), (940, -19),
                   (1480, -47), (2340, -67), (3690, -16), (5840, -7.5), (9230, -3), (14600, 0)]
    # stereo balance: (frequency [Hz], left minus right [dB])
    balance = [(60, 0), (180, 0.8), (540, 0.6), (1300, 0.1), (2400, 0.5), (4860, 1.3), (8500, 2.2),
               (14600, 0.3)]
    speed_hz = motor_speed_hz()
    motor_turns = np.cumsum(speed_hz) / SR
    pressures_db, contacts_db, stones, bites = [], [], [], HARD_BITES
    for press, (high_side_s, swell_db, gap_db, bite_db) in zip([steady_press, growing_press], run_out):
        stones.append(stone_turns(motor_turns, high_side_s))
        pressures_db.append(pressure_db(press))
        contacts_db.append(contact_db(pressures_db[-1], stones[-1], swell_db, gap_db))
        bites = np.vstack([bites, turn_bites(press, stones[-1], bite_db)])
    pressed_db, touch_db = np.maximum(*pressures_db), np.maximum(*contacts_db)
    snags = grit_snags(touch_db)
    mid, side = (gearbox(speed_hz, motor_turns) + grinding(contacts_db, bites, snags)
                 + screech(pressed_db, stones[1]) + chips(touch_db) + grip() + background())
    rings = cap_rings(bites, snags, pressed_db)
    tones = motor(speed_hz, pressed_db) + winding_squeal()
    mid = rfft(mid + rings + tones + from_db(-9) * reflections(mid + rings, t60_s=0.049), FFT_SIZE)
    side = rfft(side + reflections(rings + tones, t60_s=0.17), FFT_SIZE) * from_db(colour_db(side_colour))
    lean = from_db(colour_db(balance) / 2)
    return irfft(np.array([(mid + side) * lean, (mid - side) / lean]), FFT_SIZE)[:, :N]


def record(dry):
    """Steep low-pass."""
    cutoff_hz = 15100
    return irfft(rfft(dry, FFT_SIZE) / np.sqrt(1 + (BIN_HZ / cutoff_hz) ** 400), FFT_SIZE)[:, :N]


dry = scene()
out = record(dry)
wav_record(out)
```